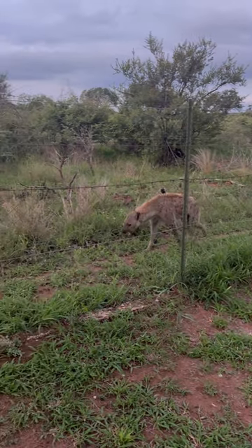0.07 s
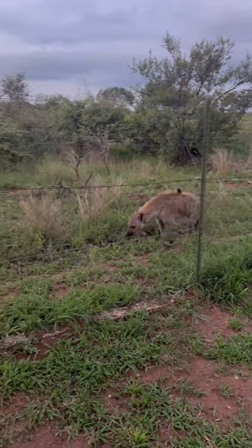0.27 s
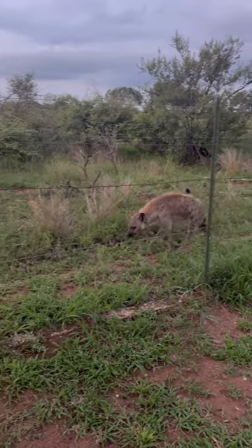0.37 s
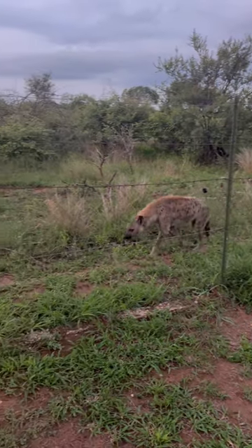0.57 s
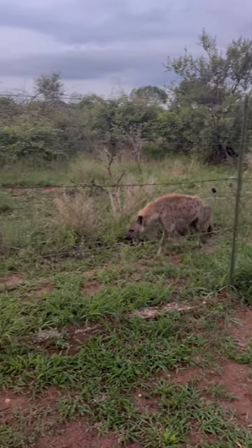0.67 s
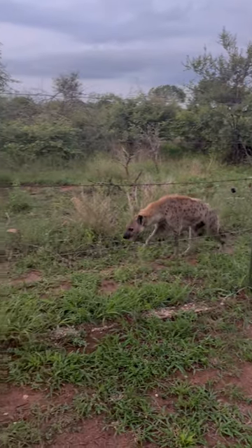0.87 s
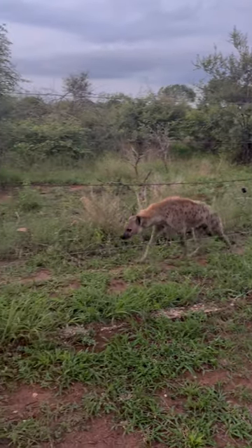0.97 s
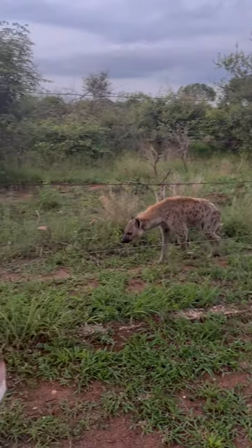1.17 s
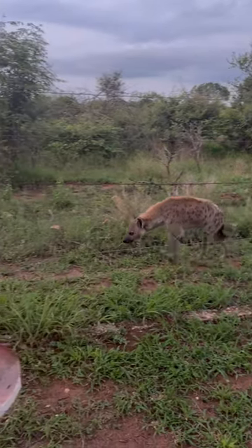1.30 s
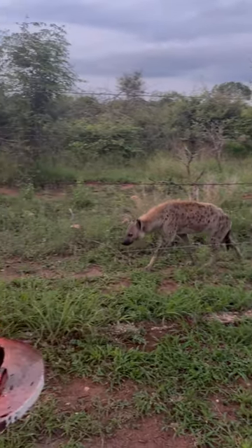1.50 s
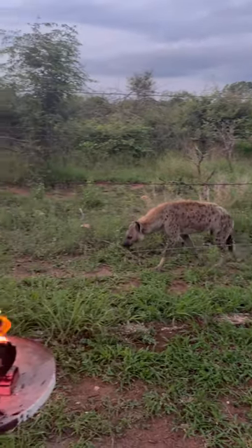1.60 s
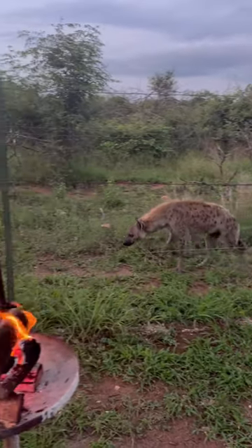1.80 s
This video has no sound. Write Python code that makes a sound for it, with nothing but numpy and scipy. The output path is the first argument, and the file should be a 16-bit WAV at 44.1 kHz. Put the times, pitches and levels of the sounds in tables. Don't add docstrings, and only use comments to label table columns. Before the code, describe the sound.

Close fire crackle with dry snaps and fine sap hiss over a low flame and breeze rumble; outdoors, two slowing bird trills to one side, a distant rattle and whistles, faint insects, handheld phone microphone.

```python
import sys
import numpy as np
from scipy import signal
from scipy.fft import rfft, irfft
from scipy.io import wavfile
from scipy.ndimage import uniform_filter1d, map_coordinates

SR = 44100
rng = np.random.default_rng(int(sys.argv[2]) if len(sys.argv) > 2 else 0)


def undo_db(level):
    steps = np.asarray(level, float) / 20
    return 10 ** steps


def transcribe(u):
    v = np.clip(np.atleast_2d(u).T, -1, 1)
    q = np.round(v * 32767).astype(np.int16)
    wavfile.write(sys.argv[1], SR, q)


N = 81585
HZ = np.fft.rfftfreq(N, 1 / SR)


def evened(x):
    return x / np.sqrt(np.mean(x ** 2) + 1e-20)


def read(points, hz):
    f, value = np.transpose(points)
    return np.interp(np.log(hz + 1), np.log(f + 1), value)


def follow(points, column=1):
    rows = np.transpose(points)
    return np.interp(np.arange(N) / SR, rows[0], rows[column])


def add(mix, s, sound):
    part = mix[round(s * SR):][:len(sound)]
    part += sound[:len(part)]


def ring(x, hz, width_hz):
    return signal.lfilter(*signal.iirpeak(min(hz, SR * .45), hz / width_hz, SR), x)


def colour(x, tone):
    return evened(irfft(rfft(x) * undo_db(read(tone, HZ)), N))


def lumpy(lump_db, lump_s):
    noise = rng.standard_normal(N)
    wander = evened(uniform_filter1d(rng.standard_normal(N), round(lump_s * SR)))
    return noise * undo_db(lump_db * wander)


def steady(x, hold_s):
    return x / np.sqrt(uniform_filter1d(x ** 2, round(hold_s * SR)) + 0.13)


def slide(top_hz, end_hz, length_s):
    u = np.arange(0, 1, 1 / (length_s * SR))
    hz = end_hz + (top_hz - end_hz) * (.5 + .5 * np.cos(np.pi * u))
    return np.sqrt(2) * np.sin(np.pi * u) ** .6 * np.sin(2 * np.pi * np.cumsum(hz) / SR)


# [t/s, level/dB, ring f/Hz, second ring f/Hz, length/s]
SNAPS = [(.5870, -46.5, 9180, 7100, 0.0032), (.5871, -47, 12000, 13400, .001),
         (.6486, -38, 6570, 9900, 0.0023), (.6487, -40.5, 11500, 10000, 0.00061),
         (.6486, -49, 2960, 3570, 0.0022), (.7632, -44.5, 6600, 7500, 0.0018),
         (.7633, -49, 12900, 10000, 0.0016), (.8295, -47, 7200, 8300, 0.0033),
         (.8296, -39.5, 12200, 9800, 0.0028), (.8297, -51, 15200, 5200, .0022),
         (.8297, -53, 3300, 4000, .002), (1.0982, -41.5, 1240, 2550, 0.0014),
         (1.0981, -44, 5940, 7300, 0.0019), (1.0982, -36, 10300, 11400, 0.0011),
         (1.0983, -38.5, 12600, 14800, 0.002), (1.7070, -46.5, 9800, 12500, 0.0029),
         (1.7075, -56.5, 4540, 7800, 0.0021), (1.7012, -56, 8400, 12600, .002),
         (.9083, -51, 7460, 12500, .001), (.9084, -53, 14400, 13300, .001),
         (1.195, -62.5, 1000, 1900, 0.0029)]


def snaps():
    second_db, ring_width_hz, tail_db, tail_s = -2, 1300, -21, .007
    breadth = .025
    out, t = np.zeros(N), np.arange(900) / SR
    for s, db, hz, second_hz, length_s in SNAPS:
        shape = np.exp(-(t / length_s) ** 2) + undo_db(tail_db) * np.exp(-t / tail_s)
        shape *= np.minimum(t * SR / 10, 1)
        first_break = 7 * (np.arange(len(t)) == 10)
        burst = shape * (rng.standard_normal(len(t)) + first_break)
        first = ring(ring(burst, hz, ring_width_hz), hz, ring_width_hz)
        second = ring(ring(burst, second_hz, ring_width_hz), second_hz, ring_width_hz)
        rung = evened(first) + undo_db(second_db) * evened(second)
        sound = (1 - breadth) * evened(rung) + breadth * evened(ring(burst, 6100, 21000))
        add(out, s, undo_db(db) * sound / abs(sound).max())
    return out


# [t/s, level/dB]
TICKS = [(.0088, -54), (.067, -65), (.077, -66), (.0918, -64), (.2754, -66), (.3417, -61), (.3512, -61),
         (.3757, -62), (.4296, -62), (.507, -59), (.5793, -64), (.7063, -62), (.7961, -65), (.826, -63),
         (.8854, -62), (.9661, -57), (1.026, -60), (1.2011, -58), (1.2147, -65), (1.3566, -61),
         (1.4346, -58), (1.4822, -58), (1.6677, -62), (1.7022, -62), (1.7253, -68), (1.7598, -66),
         (1.8487, -64)]


def ticks():
    hz, width_hz, decay_s, boost_db = 12500, 3500, .0009, 4
    out, t = np.zeros(N), np.arange(900) / SR
    for s, db in TICKS:
        burst = rng.standard_normal(len(t)) * np.exp(-t / decay_s)
        tick = ring(ring(burst, hz, width_hz), hz, 2 * width_hz)
        add(out, s, undo_db(db + boost_db) * tick / abs(tick).max())
    return out


# [t/s, level/dB, fine fizz on top/dB]
SIZZLE = [(0, -58, -12), (.07, -73, 0.5), (.13, -73, -11), (.3, -64.5, -13), (.42, -68, 3), (.475, -55, 7),
          (.54, -65.5, -10), (.61, -66.5, -11), (.77, -71, -2), (.81, -70, 5.5), (.97, -61.5, 2),
          (1.04, -67, 1), (1.2, -75, 6), (1.33, -77, 4.5), (1.38, -68, 1.5), (1.52, -69, 5),
          (1.7, -71, 1.5), (1.85, -77.5, 3)]
# [f/Hz, level per Hz/dB]
SIZZLE_TONE = [(800, -16), (2000, -9), (5800, -10), (7000, -4), (8600, -9), (12500, 0), (14500, -4),
               (16500, -8)]


def sizzle():
    spits_per_s, spread_db, spit_share, fizz_hz = 900, 3.5, .45, 10200
    spits = rng.random(N) < spits_per_s / SR
    spits = spits * undo_db(spread_db * np.minimum(rng.exponential(1, N), 4))
    spits = np.convolve(spits, np.exp(-np.arange(60) / 25.0))[:N] * rng.standard_normal(N)
    hiss = colour(evened(lumpy(2.4, 0.04)) + spit_share * evened(spits), SIZZLE_TONE)
    fizz = irfft(rfft(hiss) / (1 + (fizz_hz / (HZ + 1)) ** 12), N)
    return undo_db(follow(SIZZLE)) * (hiss + (undo_db(follow(SIZZLE, column=2)) - 1) * fizz)


# [f/Hz, level per Hz/dB]
RUMBLE = [(37, -16), (49, 7), (59, -0.5), (80, -7), (215, -9.5), (496, -26), (535, -22.5), (577, -25.5),
          (1500, -44.5), (1950, -74), (3300, -120)]
# [f/Hz, level per Hz/dB]
GUST_TONE = [(37, -19), (52, 4), (97, -9.5), (137, -7.5), (179, -10.5), (255, -10), (502, -34.5),
             (549, -33.5), (3000, -59.5), (3900, -55), (6600, -120)]
# [t/s, level/dB]
GUST = [(0.0, -45.5), (0.02, -51), (0.19, -53.5), (0.235, -31), (0.298, -31.5), (0.386, -40),
        (0.462, -50.5), (0.504, -48.5), (0.638, -54.5), (0.73, -49.5), (0.854, -50.5), (1.086, -50.5),
        (1.128, -50), (1.184, -51), (1.39, -54), (1.534, -52), (1.586, -54.5), (1.85, -51)]


def flames_and_gust():
    calm_db, span_db = -44, 4
    share = np.clip((follow(GUST) - calm_db) / span_db, 0, 1)
    rumble = steady(colour(lumpy(2.5, .03), RUMBLE), 0.1)
    roar = steady(colour(lumpy(1.6, 0.026), GUST_TONE), 0.0523)
    return undo_db(follow(GUST)) * (np.sqrt(1 - share) * rumble + np.sqrt(share) * roar)


def bush(x, t60_s):
    build_s = .006
    t = np.arange(SR // 2) / SR
    taps = rng.choice([-1., 1.], (2, len(t))) * undo_db(-60 * t / t60_s)
    taps *= 1 - np.exp(-(t / build_s) ** 2)
    return signal.fftconvolve(x[None], taps / np.linalg.norm(taps[0]), axes=1)[:, :N]


# [t/s, level/dB]
TRILL = [(.165, -71), (0.191, -74), (0.214, -65), (.238, -85), (.262, -72), (.296, -70), (0.324, -68.5),
         (.356, -70), (.389, -63), (0.426, -61), (0.467, -60), (0.504, -59), (0.548, -63.5), (1.039, -77),
         (1.062, -74), (1.084, -62), (1.114, -62), (1.144, -64), (1.177, -62), (1.217, -59.5), (1.256, -58),
         (1.295, -59)]
# [t/s, delay/s]
PORT_DELAYS = [(.3, 0.000313), (1.2, 0.000289)]


def triller():
    x = np.zeros(N)
    for s, db in TRILL:
        add(x, s, undo_db(db) * slide(5680, 4620, .02))
    echo = undo_db(-5) * bush(x, .17)
    near = x + .5 * echo[0]
    late = map_coordinates(near, [np.arange(N) - follow(PORT_DELAYS) * SR], order=3)
    return np.array([late, near]) + .75 * echo


def rattle():
    start_s, gap_s, level_db, swell_db = .535, .0201, -76, 5
    out = np.zeros(N)
    for k, swell in enumerate(np.linspace(0, 1, num=13)):
        note = slide(4250, 3700, .011)
        add(out, start_s + k * gap_s, undo_db(level_db + swell_db * swell) * note)
    return out


# [t/s, pitch f/Hz, level/dB]
WHISTLES = [
    [(0.072, 3050, -73.5), (0.094, 3450, -72), (0.106, 3419, -72), (0.13, 3255, -73.5), (0.17, 3260, -66),
     (0.18, 3334, -85), (0.204, 3130, -73), (0.212, 3344, -92)],
    [(1.365, 2820, -82), (1.385, 2683, -85), (1.409, 2612, -83.5), (1.431, 2610, -79), (1.493, 3204, -77),
     (1.587, 3620, -83.5), (1.617, 4020, -79), (1.64, 4180, -107)],
    [(1.75, 4240, -93), (1.762, 3941, -86), (1.776, 3330, -73), (1.794, 3010, -64.5), (1.802, 3020, -105),
     (1.81, 2925, -99)],
]


def whistles():
    x, t = np.zeros(N), np.arange(N) / SR
    waver = undo_db(2.5 * evened(uniform_filter1d(rng.standard_normal(N), size=300)))
    for rows in WHISTLES:
        edge = np.clip(np.minimum(t - rows[0][0], rows[-1][0] - t) / 0.0035, 0, 1)
        tone = np.sqrt(2) * np.sin(2 * np.pi * np.cumsum(follow(rows)) / SR)
        x += edge * waver * undo_db(follow(rows, column=2)) * tone
    pip_s, pip_hz, pip_db = 1.533, 8500, -73
    add(x, pip_s, undo_db(pip_db) * slide(pip_hz, pip_hz * 0.976, 0.024))
    return x


def deep_birds():
    rattling, whistling = rattle(), whistles()
    echo = bush(undo_db(-12) * whistling + rattling, .25)
    port_db = np.array([[.5], [-.5]])
    return (whistling + rattling) * undo_db(port_db) + echo


def insects():
    hz, width_hz, level_db = 5100, 900, -78.5
    song = [evened(ring(ring(lumpy(3.0, .015), hz, width_hz), hz, width_hz)) for port in range(2)]
    return undo_db(level_db) * np.array(song)


# [f/Hz, level per Hz/dB]
AIR = [(500, 5.5), (1000, -3), (2000, -9), (3300, -17), (6000, -27), (10000, -41.5), (16000, -18)]


def far_air():
    return undo_db(-65.5) * colour(lumpy(2.2, 0.045), AIR)


# [f/Hz, likeness 0-1]
SAME = [(60, 1.0), (130, .9998), (300, .97), (480, .4), (900, .55), (2300, .2), (4000, .5), (5800, .999),
        (14000, .999), (15500, .7)]
# [f/Hz, lead/rad]
LEAD = [(330, .05), (700, 3.2), (1800, 5.6), (6000, 6.28), (7300, 6.6), (11200, 9.42), (14100, 9.42),
        (15500, 10.4)]
# [f/Hz, level/dB]
LOUDER_LEFT = [(240, 0), (330, -.5), (480, -3), (950, -1.5), (1900, -1), (3800, 0)]


def ports(x, other, near=False):
    same, lead = read(SAME, HZ), read(LEAD, HZ)
    if near:
        same = np.clip(same, .85, .988)
        lead = read(LEAD, np.maximum(HZ, 6300))
    left = rfft(x)
    right = same * np.exp(1j * lead) * left + np.sqrt(1 - same ** 2) * rfft(other)
    tilt = undo_db(read(LOUDER_LEFT, HZ) / 2)
    return np.array([irfft(left * tilt, N), irfft(right / tilt, N)])


def scene():
    left, other = (sizzle() + flames_and_gust() + far_air() for port in range(2))
    crackle, other_crackle = (snaps() + ticks() for port in range(2))
    fire = ports(left, other) + ports(crackle, other_crackle, near=True)
    return fire + insects() + triller() + deep_birds()


def roll_off(x):
    return signal.sosfilt(signal.butter(12, 16670, fs=SR, output="sos"), x)


def record(dry):
    low_cut = signal.butter(N=4, Wn=40, btype="highpass", fs=SR, output="sos")
    cut = signal.sosfilt(low_cut, dry)
    band_limit = signal.firwin(numtaps=255, cutoff=15900, fs=SR)
    cut = signal.oaconvolve(cut, band_limit[None], "same")
    return roll_off(cut)


dry = scene()
out = record(dry)
transcribe(out)
```